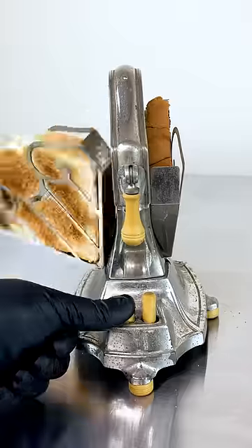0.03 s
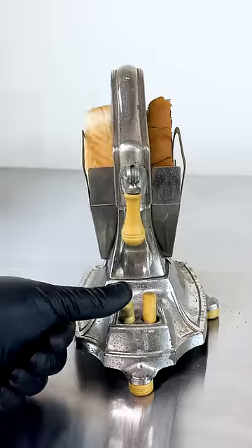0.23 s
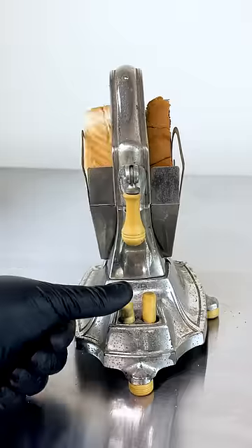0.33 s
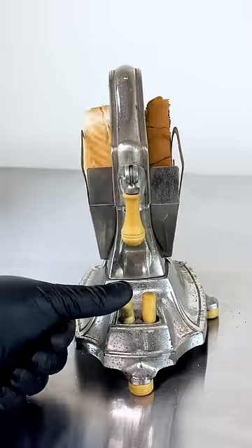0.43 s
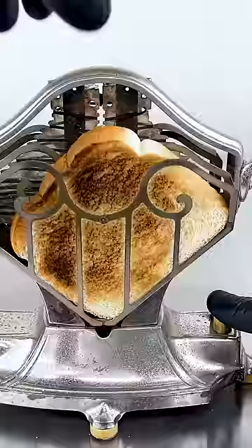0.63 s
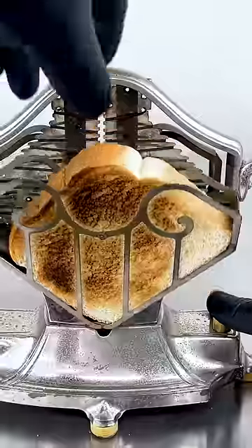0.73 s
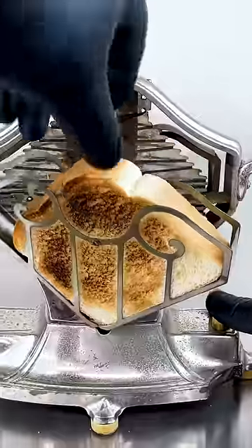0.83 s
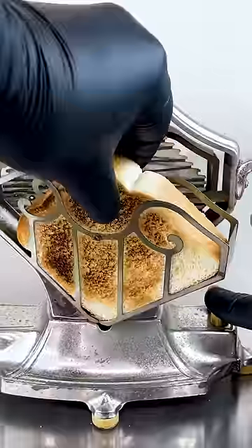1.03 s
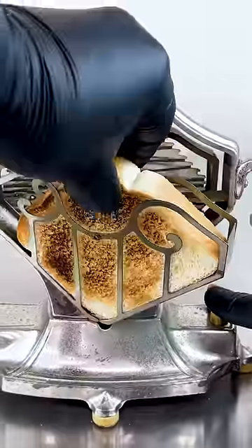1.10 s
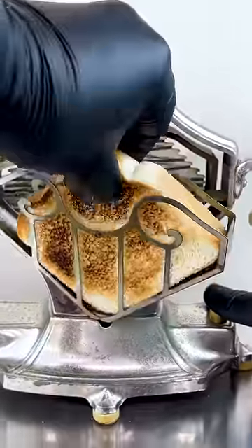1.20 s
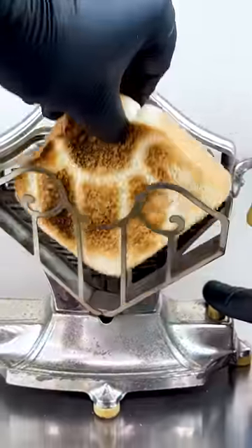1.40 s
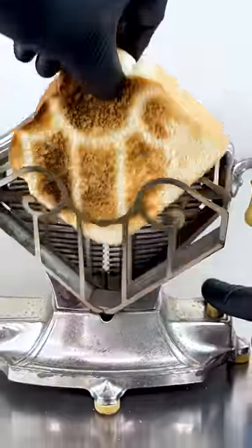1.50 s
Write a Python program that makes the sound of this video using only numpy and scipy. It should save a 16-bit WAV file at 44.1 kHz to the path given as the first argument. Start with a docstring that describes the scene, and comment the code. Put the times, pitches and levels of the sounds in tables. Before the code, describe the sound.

Metal clacks from a toaster's swinging holder, followed by a knock and dry toast scraping wires.

```python
"""An old metal toaster, close by on a steel counter in a small room: its lever is pressed, and the toast
holder swings round, rattles, clacks against its stop and rocks the base. A gloved hand then knocks the
wire basket and draws the slice out, the crust scraping along the wires.
Each impact excites damped modes, a few as clear tones and the dense rest as a decaying burst of noise.
Sliding contacts sound by stick-slip friction: random impulses filtered by the body's resonances."""
import sys
import numpy as np
from scipy import signal
from scipy.fft import rfft, irfft, next_fast_len
from scipy.io import wavfile
from scipy.ndimage import uniform_filter1d

SR = 44100
rng = np.random.default_rng(int(sys.argv[2]) if len(sys.argv) > 2 else 0)


def generate_wav(sig):
    """Save sig (samples, or channels by samples) to the path in sys.argv[1] as 16-bit PCM at SR."""
    pcm = np.round(np.clip(np.atleast_2d(sig).T, -1, 1) * 32767).astype(np.int16)
    wavfile.write(sys.argv[1], SR, pcm)


N = 68355
RING_S = .6  # length of one burst or ping
MODE_GRID_HZ = np.arange(0, 17000, 45)
# reverberation time of the room: frequency_hz, t60_s
ROOM_T60 = [(200, 0.69), (1200, 0.49), (4000, 0.37), (8000, 0.39), (11500, 0.22), (15000, 0.2)]
# phase between the channels for each source position: frequency_hz, left_lead_rad
HOLDER_PHASE = [(2100, 0), (3000, 1), (4100, 1), (5250, 4.8), (7900, 8.7), (9500, 9.5), (16000, 15.8)]
BASKET_PHASE = [(2000, 0), (5000, .6), (7400, 6.2), (8300, 6.5), (10500, 9.1), (12200, 9.4), (16000, 12.6)]


def holder(comb, full_db=-19, ring_growth=1.0, modes_db=-6):
    """Impact excitation: the linkage rattles and the holder hits its stop; hard blows ring clearly."""
    # impacts: start_s, level_db, bass_db, treble_db, t60_s
    clacks = [(0.0206, -43.5, -13, 4, 0.016), (0.0423, -46, 5.5, -4, 0.2), (.052, -43.5, 8.5, 1, 0.079),
              (0.1133, -49.5, -6.5, 0.5, 0.078), (0.13, -47, -15, 5.5, .03),
              (0.1576, -33.5, -13, -8.5, 0.1), (.185, -38.5, -8, 3.5, 0.085), (.218, -39.5, -2, 4.5, 0.12),
              (.2338, -18, -10, 4, 0.038), (0.237, -22.5, -4, -3, 0.057), (.244, -27, 2, -6, 0.12),
              (.252, -30.5, 11, 6, 0.076), (.289, -41.5, 14, -29, 0.21), (0.3072, -39, 14, -1, 0.057),
              (0.322, -39, 16.5, 12, 0.043), (0.4203, -46, 11.5, 0.5, 0.057)]
    # clear modes: pitch_hz, level_db, t60_s
    modes = [(227, -2, .22), (874, -2, .14), (1310, -7, .09), (2637, -9, .1), (3438, 1, .08),
             (6312, -8, .11), (11285, 2, .045), (11845, -5, .06)]
    # spectrum of the dense modes: frequency_hz, level_db
    colour = [(90, -31.5), (230, -8), (600, -6), (980, 1), (1700, -7.5), (2600, -5.5), (2900, -6),
              (3500, -4.5), (4700, -10), (6200, -7), (8300, -6.5), (9400, -15), (11300, 1), (12000, -4.5),
              (12800, -15.5), (15500, -44.5)]
    blows = [(s, db + modes_db + ring_growth * (db - full_db), bass, treble)
             for s, db, bass, treble, _ in clacks]
    out = ringing(blows, modes, HOLDER_PHASE)
    for s, db, bass, treble, t60 in clacks:
        clack = strike(combed(colour, comb), HOLDER_PHASE, t60, bass, treble,
                       room_db=-17.0, rise_s=0.0012, crack_db=3)
        add(out, s, amp(db) * clack)
    return out


def swing():
    """Friction in the turning pivot drives the holder's resonances into a hum."""
    # envelope: time_s, level_db
    envelope = [(0, -47.5), (.035, -54.5), (.1, -56.5), (.17, -46), (.25, -40.5), (.33, -49.5), (.42, -59),
                (.52, -69), (.66, -77)]
    # friction spectrum: frequency_hz, level_db
    colour = [(25, -14.5), (52, -7.5), (100, -4), (330, 2), (900, -9), (2600, -12.5), (8000, -26),
              (15000, -39.5)]
    # resonances: pitch_hz, bandwidth_hz, level_db
    rings = [(221, 6, 0), (441, 12, -14)]
    return stroke(envelope) * friction(colour, rings, HOLDER_PHASE, per_s=5000, spread_db=3.5)


def base():
    """The rocking cast base knocks on the counter, exciting low modes: dull thuds."""
    # impacts: start_s, level_db
    thuds = [(0.049, -44.5), (0.106, -43), (0.245, -40.5), (0.282, -41.5), (.311, -35.5), (.388, -39),
             (0.461, -53.5)]
    # clear modes: pitch_hz, level_db, t60_s
    modes = [(154, -7, .25), (221, -3, .3), (814, -12, .25)]
    # spectrum of the dense modes: frequency_hz, level_db
    colour = [(25, -29.5), (55, -13), (150, -0.5), (230, -6), (480, -7), (750, -9.5), (1300, -29),
              (6000, -59.5)]
    out = ringing([(s, db, 0, 0) for s, db in thuds], modes, HOLDER_PHASE)
    for s, db in thuds:
        thud = strike(colour, HOLDER_PHASE, t60=0.19, bass_db=2, treble_db=-1.5,
                      room_db=-14.5, rise_s=0.0027)
        add(out, s, amp(db) * thud)
    return out


def clink():
    """Free vibration: loose parts ping as the lever takes up its play and as the basket rebounds."""
    # damped sinusoids: start_s, pitch_hz, level_db, t60_s
    pings = [(0.0435, 1293, -47, 0.17), (0.0449, 2594, -38, 0.039), (1.056, 1161, -59.5, 0.32),
             (1.057, 5540, -56.5, .075)]
    t, out = np.arange(round(RING_S * SR)) / SR, np.zeros((2, N))
    for s, hz, db, t60 in pings:
        sine = (stereo_gain(hz, HOLDER_PHASE)[:, None] * np.exp(2j * np.pi * hz * t)).imag
        add(out, s, sine * amp(db - 60 * t / t60))
    return out


def basket(comb, full_db=-28, ring_growth=0.37, modes_db=-7):
    """Impact excitation: the hand knocks the wire basket on its hinge; light touches hardly ring."""
    # impacts: start_s, level_db, bass_db, treble_db, t60_s
    touches = [(0.7257, -70.5, -25, -10, 0.016), (0.7342, -56.5, -12, -51, 0.15),
               (.875, -31, -10.5, 6.5, 0.086), (0.879, -34, 8, -13.5, 0.052), (.888, -40.5, 9, 0, 0.26),
               (0.9216, -38.5, 5, -3.5, 0.11), (1.057, -50.5, 4.5, -21, 0.15),
               (1.1244, -57.5, -3, -2.5, 0.039)]
    # clear modes: pitch_hz, level_db, t60_s
    modes = [(296.3, -2, 0.25), (371.6, -13.5, 0.48), (436, -14, 0.51), (521.4, -13, 0.43), (946, -2, 0.15),
             (1162, -8.5, 0.23), (2115, -25, 0.78), (2500, -13, 0.14), (3316, -25, 0.6), (4140, -15, 0.19),
             (5505, 1.5, 0.079), (6910, -4, 0.16), (8930, -6.5, 0.15)]
    # spectrum of the dense modes: frequency_hz, level_db
    colour = [(90, -16.5), (210, -29), (290, -3), (700, -6.5), (1050, 0.5), (2000, -14), (3400, -15),
              (5400, -9.5), (6200, -10.5), (7300, -6), (9200, -12), (11800, -10), (13200, -6),
              (15300, -12.5), (16200, -20)]
    blows = [(s, db + modes_db + ring_growth * (db - full_db), bass, treble)
             for s, db, bass, treble, _ in touches]
    out = ringing(blows, modes, BASKET_PHASE)
    for s, db, bass, treble, t60 in touches:
        knock = strike(combed(colour, comb), BASKET_PHASE, t60, bass, treble,
                       room_db=-15.5, rise_s=0.00081, crack_db=2)
        add(out, s, amp(db) * knock)
    return out


def scrape(comb, brightening=0.54, full_db=-47, bright_hz=6000, catch_db=2, catch_s=0.024):
    """Stick-slip friction of dry crust rings the wires, brighter as it presses harder."""
    # envelope set by the pressure of the crust: time_s, level_db
    envelope = [(1.14, -75), (1.172, -59), (1.25, -57.5), (1.35, -52), (1.42, -47.5), (1.465, -48),
                (1.51, -51), (1.55, -58)]
    # friction spectrum: frequency_hz, level_db
    colour = [(50, -24.5), (110, -1), (200, -17), (310, -8.5), (650, -21.5), (1300, -20.5), (2500, -21.5),
              (5500, -14), (7800, -16), (10000, -13.5), (12200, -16), (13500, -10), (15500, -12.5),
              (16300, -35)]
    # wire resonances: pitch_hz, bandwidth_hz, level_db
    rings = [(308.7, 15, -12.5), (399, 40, -15.5), (475, 18, -18), (795, 17, -26), (3378, 40, -22),
             (7760, 31, -13.5), (14550, 340, -11.5)]
    sound = friction(combed(colour, comb), rings, BASKET_PHASE, per_s=7000, spread_db=1.5)
    level = stroke(envelope)
    dull = signal.sosfiltfilt(signal.butter(2, bright_hz, fs=SR, output="sos"), sound)
    treble = (sound - dull) * (level / amp(full_db)) ** brightening
    catches = amp(catch_db * unit(uniform_filter1d(rng.standard_normal(N), round(catch_s * SR))))
    return level * catches * (dull + treble)


def handling():
    """Soft-contact friction: the gloved hand rubs dully against the toaster."""
    # envelope: time_s, level_db
    envelope = [(.695, -72), (.755, -52), (.8, -57), (.85, -60), (.93, -55.5), (1.08, -65.5), (1.16, -71.5)]
    # friction spectrum: frequency_hz, level_db
    colour = [(35, -32), (80, 1.5), (130, 2.5), (190, -18), (290, -1.5), (650, -25.5), (2100, -28),
              (3500, -37), (12000, -47.5)]
    # resonance: pitch_hz, bandwidth_hz, level_db
    rings = [(251, 5.3, -6)]
    return stroke(envelope) * friction(colour, rings, BASKET_PHASE, per_s=4200, spread_db=4.5)


def lever_rub():
    """Sliding friction gives a faint, high rub as the lever settles."""
    # envelope: time_s, level_db
    envelope = [(.612, -86), (.632, -66), (.66, -67), (.69, -82.5)]
    # friction spectrum: frequency_hz, level_db
    colour = [(300, -22), (9000, -15.5), (11500, -3), (15000, -34.5)]
    return stroke(envelope) * friction(colour, [], HOLDER_PHASE, per_s=4600, spread_db=1.5)


def room_rumble(level_db=-70):
    """Steady ambient noise, strongest at low frequencies."""
    # spectrum: frequency_hz, level_db
    colour = [(20, -20.5), (60, 0), (300, -10.5), (600, -27), (16000, -41.5)]
    return amp(level_db) * coloured(rng.standard_normal((2, N)), colour, HOLDER_PHASE)


def strike(colour, phase, t60, bass_db, treble_db, room_db, rise_s, crack_db=0, crack_s=.004):
    """Modal overlap: one blow's dense modes merge into a noise burst with a reverberant tail."""
    t = np.arange(next_fast_len(round(RING_S * SR))) / SR
    hz = np.fft.rfftfreq(len(t), 1 / SR)
    noise = coloured(rng.standard_normal((2, len(t))), colour, phase)
    spectrum = rfft(noise) * hardness(hz, bass_db, treble_db)
    burst = amp(-60 * t / t60 + crack_db * np.exp(-t / crack_s))
    room_build = 1 - np.exp(-t / 0.005)
    centres, out = np.transpose(ROOM_T60)[0], np.zeros((2, len(t)))
    for share, (centre, room_t60) in zip(np.eye(len(centres)), ROOM_T60):
        band = irfft(spectrum * np.interp(hz, centres, share), len(t))
        tail = room_build * amp(room_db - 60 * t / room_t60)
        out += band * np.hypot(burst, tail) * (1 - np.exp(-t * centre))  # low bands start more slowly
    return out * (1 - np.exp(-t / rise_s))


def ringing(blows, modes, phase, room_db=-20):
    """Each blow adds energy to every mode; it decays exponentially and lingers in the room."""
    t, out = np.arange(N) / SR, np.zeros((2, N))
    for hz, db, t60 in modes:
        tail = amp(room_db - 60 * t / read(ROOM_T60, hz))
        fade = np.hypot(amp(-60 * t / t60), tail) * (1 - np.exp(-t * hz))
        energy = np.zeros((1, N))
        for s, blow_db, bass, treble in blows:
            add(energy, s, (amp(blow_db + db) * hardness(hz, bass, treble) * fade[None]) ** 2)
        phasor = np.exp(2j * np.pi * (hz * t + rng.random()))
        out += np.sqrt(energy) * (stereo_gain(hz, phase)[:, None] * phasor).real
    return out


def hardness(hz, bass_db, treble_db):
    """Contact hardness shapes the spectrum: a soft blow favours the bass, a hard one the treble."""
    return amp(read([(600, bass_db), (2000, 0.0031), (6000, 0.00063), (11000, treble_db)], hz))


def friction(colour, rings, phase, per_s, spread_db):
    """Stick-slip: impulses of random size and sign excite a body and its narrow resonances."""
    sizes = amp(spread_db * np.minimum(rng.exponential(1, (2, N)), 5))
    signs = rng.choice([-1, 1], (2, N))
    slips = sizes * signs * (rng.random((2, N)) < per_s / SR)
    body = coloured(slips, colour, phase)
    return body + sum(amp(db) * unit(signal.lfilter(*signal.iirpeak(hz, hz / width, SR), body))
                      for hz, width, db in rings)


def resonance_comb(depth_db, full_hz=1500):
    """A metal part's countless small resonances form random peaks and dips, in dB."""
    ripple = np.clip(rng.standard_normal(len(MODE_GRID_HZ)), -2, 2)
    return depth_db * ripple * np.minimum(MODE_GRID_HZ / full_hz, 1)


def combed(colour, comb):
    """Responses in series add in dB: a smooth spectrum plus the comb of resonances."""
    return np.transpose([MODE_GRID_HZ, read(colour, MODE_GRID_HZ) + comb])


def coloured(drive, colour, phase):
    """Mid-side mixing makes two independent drives a partly coherent pair of given spectrum, rms 1."""
    # likeness of left and right: frequency_hz, coherence
    likeness = [(150, 0.95), (350, 0.97), (700, 0.17), (1400, 0.9), (2800, 0.21), (10000, 0.89)]
    size = drive.shape[1]
    hz = np.fft.rfftfreq(size, 1 / SR)
    coherence = np.clip(read(likeness, hz), 0, 1)
    mid, side = rfft(drive) * np.sqrt([1 + coherence, 1 - coherence])
    pair = np.array([mid + side, mid - side]) * stereo_gain(hz, phase)
    return unit(irfft(pair * amp(read(colour, hz)), size))


def stereo_gain(hz, phase):
    """Level and phase cues of direction, as complex gains for left and right."""
    # balance: frequency_hz, left_minus_right_db
    balance = [(400, -1.2), (11000, 0)]
    half = amp(read(balance, hz) / 2) * np.exp(.5j * read(phase, hz))
    return np.array([half, 1 / half])


def stroke(points):
    """An amplitude envelope, silent before it starts and after it ends."""
    s, db = np.transpose(points)
    return amp(np.interp(np.arange(N) / SR, s, db, left=-120, right=-120))


def amp(db):
    """Decibels to gain."""
    return np.exp(np.asarray(db) * np.log(10) / 20)


def unit(x):
    """Scales to rms 1."""
    return x / np.sqrt(np.mean(x ** 2) + 1e-20)


def read(points, hz):
    """Interpolates a table on a log-frequency axis."""
    f, value = np.transpose(points)
    return np.interp(np.log(hz + 1), np.log(f + 1), value)


def add(mix, s, sound):
    """Superposes a sound on the mix at time s."""
    part = mix[:, max(round(s * SR), 0):][:, :sound.shape[1]]
    part += sound[:, :part.shape[1]]


def scene():
    """Superposition of all sources; knocks and scrape share the resonances of the wires."""
    frame, wires = resonance_comb(depth_db=5.5), resonance_comb(depth_db=4.5)
    mechanism = swing() + clink() + holder(frame) + base() + lever_rub()
    return mechanism + handling() + basket(wires) + scrape(wires) + room_rumble()


def record(dry):
    """Band limiting by a linear-phase low-pass filter."""
    edge_hz = 16100
    lowpass = signal.firwin(255, edge_hz, window=("kaiser", 8), fs=SR)
    return signal.oaconvolve(dry, lowpass[None], "same")


dry = scene()
out = record(dry)
generate_wav(out)
```